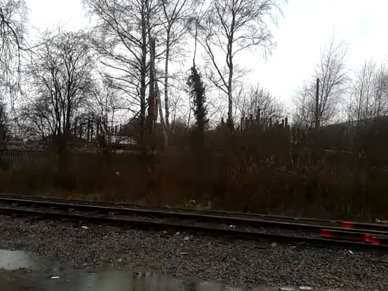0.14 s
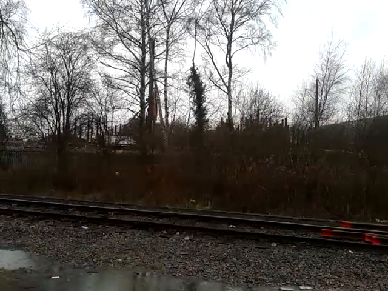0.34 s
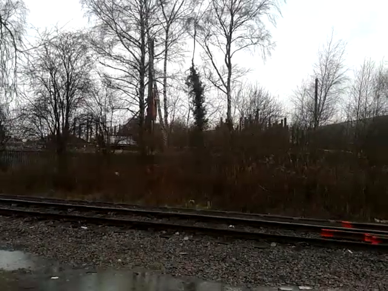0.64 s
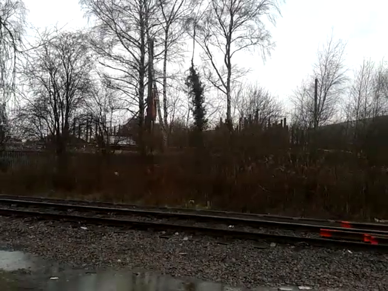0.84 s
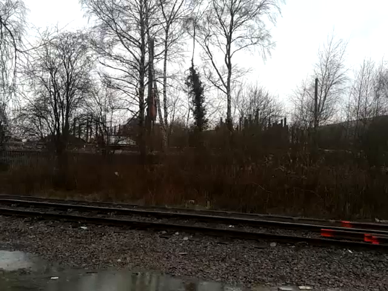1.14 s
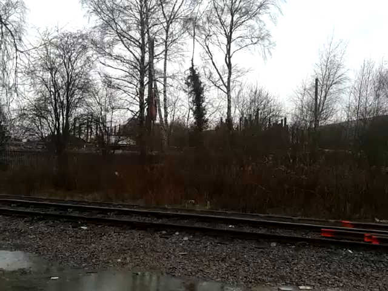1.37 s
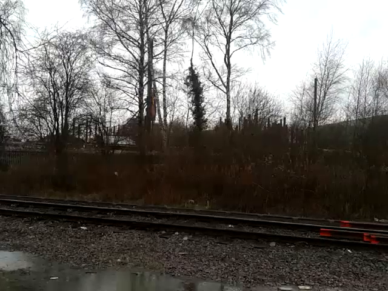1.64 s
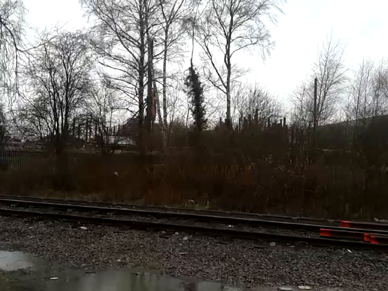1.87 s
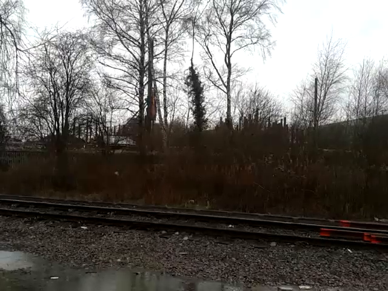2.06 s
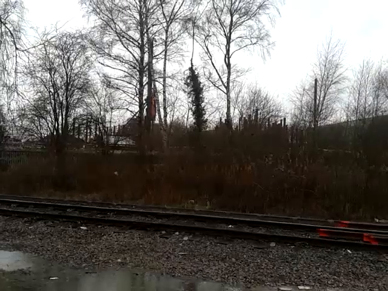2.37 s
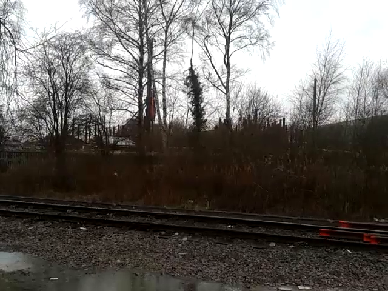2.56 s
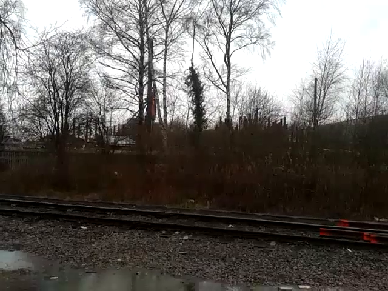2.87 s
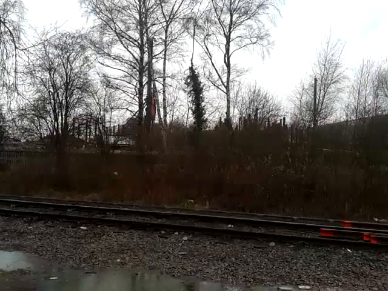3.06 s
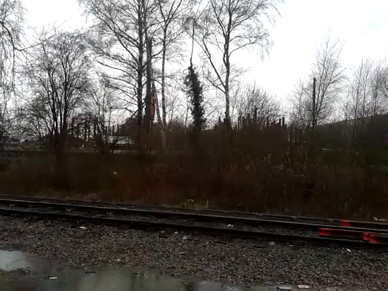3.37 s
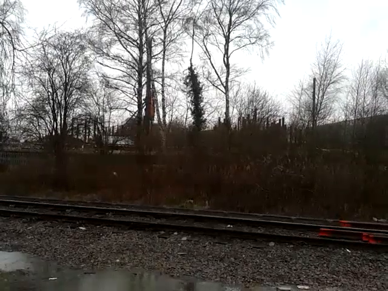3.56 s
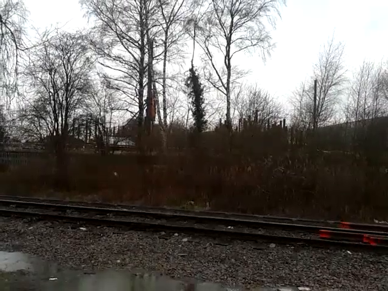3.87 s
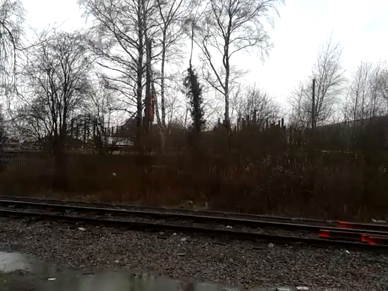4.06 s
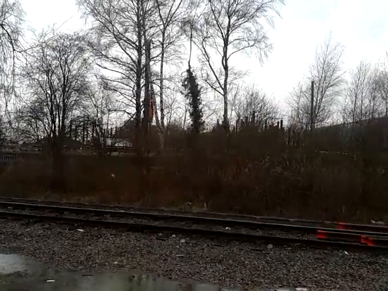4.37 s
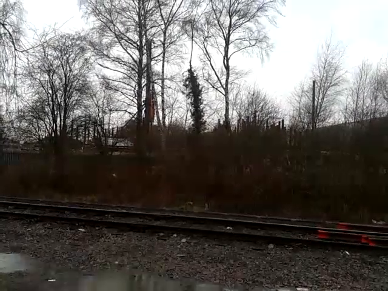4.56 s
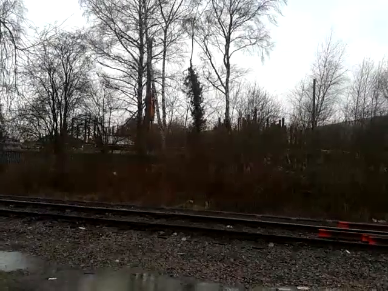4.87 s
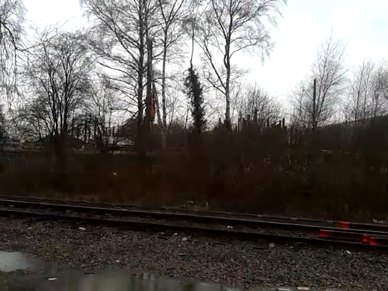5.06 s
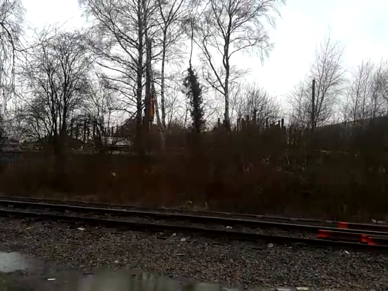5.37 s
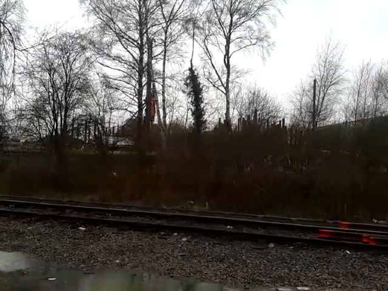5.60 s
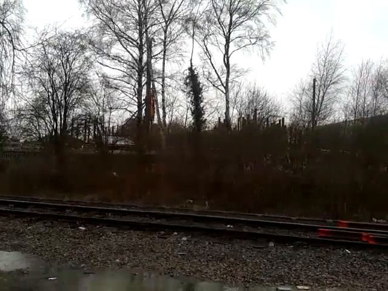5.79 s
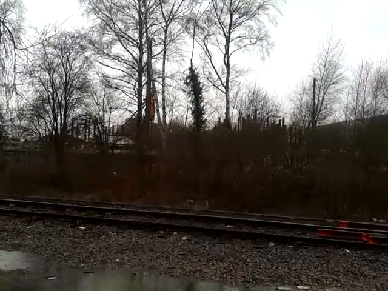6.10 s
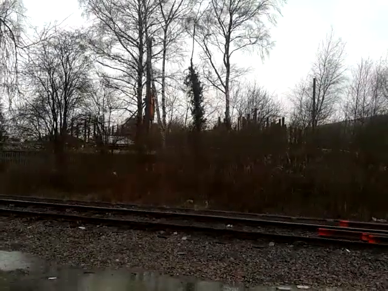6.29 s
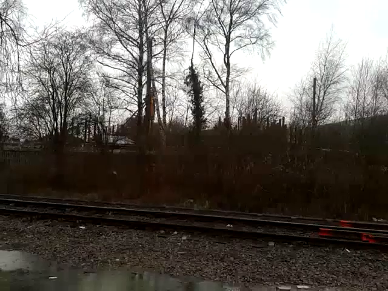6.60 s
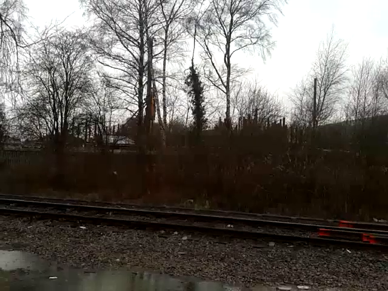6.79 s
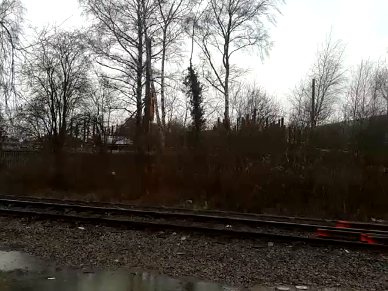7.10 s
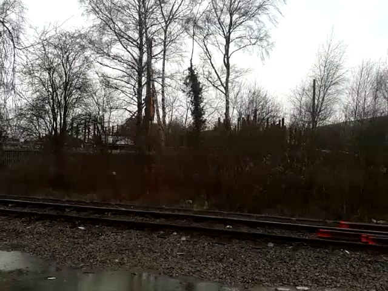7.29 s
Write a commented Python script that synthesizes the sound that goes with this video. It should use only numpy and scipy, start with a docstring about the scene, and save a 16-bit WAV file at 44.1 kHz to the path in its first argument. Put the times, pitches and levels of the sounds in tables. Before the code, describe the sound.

Evenly spaced metallic bangs from a far-off pile driver, with ringing steel, scattered echoes, small clinks between blows and a low engine drone.

```python
"""A distant piling hammer strikes a steel pile about once a second, heard across waste ground and trees.
Each blow begins as a thud, a crack and ringing steel, decaying modes under a noise burst; filtered echoes
from ground and walls follow, then a long scattered tail of noise, while the mast rings on.
Some blows are followed by pings of loose steel, and the ram clinks as it lifts before the next. Throughout,
the engine hums as a surging and sagging sine, over shaped noise of far machines, wind thumps and a few ticks."""
import sys
import numpy as np
from scipy import signal
from scipy.fft import rfft, irfft
from scipy.io import wavfile
from scipy.ndimage import uniform_filter1d

SR = 44100
rng = np.random.default_rng(int(sys.argv[2]) if len(sys.argv) > 2 else 0)


def dump_mix(stems):
    """Bounce the given channels to the path in sys.argv[1] as a 16-bit WAV at rate SR."""
    frames = np.atleast_2d(stems).T  # one column per channel
    limited = np.clip(frames, -1, 1)  # hard clip at full scale
    pcm = np.round(limited * 32767).astype(np.int16)
    wavfile.write(sys.argv[1], SR, pcm)


N = 328104  # samples in the scene

# Background of far machines and wind. Each row: frequency in Hz, relative spectral level in dB.
YARD_SPECTRUM = [(15, -27), (25, -88), (124, -0.5), (286, -6.5), (357, -3), (957, -8), (1220, -2.5),
                 (1420, -5), (2630, -12), (3280, -10), (4090, -16.5), (5920, -14), (9000, -44),
                 (11700, -54), (19800, -120)]
YARD_DB, HISS_DB = -45, -57  # rms of the background and of the microphone's hiss, before filtering

# The governor hunts in a repeating swing. Each row: time into the swing in seconds, firing rate in Hz.
ENGINE_SWING = [(0, 121), (.23, 130), (.6, 123), (.9, 117.8), (1.4, 121.2)]
SWING_S, SWING_START_S = 1.775, .15  # period and offset of the swing, seconds
ENGINE_DB = -58.5  # rms of the firing tone

# Puffs of wind on the microphone. Each row: start in seconds, level in dB, frequency in Hz.
WIND_THUMPS = [(1.659, -42, 88.8), (2.52, -36, 32.4)]

# Small dry ticks near the microphone. Each row: start in seconds, level in dB, centre in Hz, width in Hz.
DRY_TICKS = [(4.9285, -29, 4200, 3960), (5.0980, -32, 8450, 4000), (6.5700, -23.5, 10500, 5000)]
TICK_S = .0006  # time constant of a tick's decay, seconds

# Loose steel after some blows. Each row: start in seconds, level in dB, nominal frequency in Hz.
STEEL_PINGS = [(0.7897, -9.5, 5490), (4.3934, -11, 5400), (4.4942, -11, 5480), (4.5353, -15, 5600),
               (4.5803, -11, 5480), (5.3903, -17, 5470), (5.9783, -36, 7260)]

# Clinks of the lifting ram. Each row: time in seconds, level in dB.
RAM_CLINKS = [(0.5594, -36), (1.4321, -43), (2.372, -43), (3.2645, -37.5), (4.1794, -44), (5.0704, -41),
              (5.9614, -40.5), (6.8638, -40.5)]
# A light touch before each clink and a bounce after. Each row: lag in seconds, relative level in dB.
CLINK_CHATTER = [(-.018, -4), (0, 3), (.017, -6)]
# Modes of the clink. Each row: frequency in Hz, relative level in dB, t60 in seconds.
CLINK_MODES = [(3250, 5.5, 0.034), (3290, 2, 0.04), (3520, -11, 0.034), (3550, 4, 0.058)]

# Modes of the ram. Each row: frequency in Hz, relative level in dB, t60 in seconds.
RAM_MODES = [(3350, -9, 0.13), (3694, -9, 0.3), (3970, 2, 0.051), (4180, -8, 0.026), (4570, -17.5, 0.19),
             (4770, -29, 0.03), (5050, -14, 0.12), (5640, -9.5, 0.082), (6020, -16, 0.14),
             (6540, -20, 0.14), (7100, -16.5, 0.13)]
# Modes of the pile and its cap. Each row: frequency in Hz, relative level in dB, t60 in seconds.
PILE_MODES = [(499, -2, 0.069), (812, -19.5, 0.075), (899, -10.5, 0.066), (1176, -14, 0.11),
              (1644, -10, 0.13), (2090, -5, 0.098)]
# Modes of the mast. Each row: frequency in Hz, relative level in dB, t60 in seconds.
MAST_MODES = [(537.5, -13, 2.5), (541, -23, 1.8), (536, -7, .33), (1517, -11.5, .6), (1523, -26, 3.0),
              (1546, -17, .4), (2875, -21, .9), (2870, -33, 3.0), (3690, -19, 1.1)]
LOW_RING_HZ = 1000  # mast modes below this are set blow by blow

# Spectrum of the crack. Each row: frequency in Hz, relative spectral level in dB.
CRACK_SPECTRUM = [(60, -34), (150, 3), (300, 14), (600, -4.5), (1100, 3.5), (1800, -5), (2500, 0),
                  (3800, 9.5), (5000, 1.5), (6400, 4.5), (7500, -9), (9500, -19), (12000, -39),
                  (16000, -70)]
STEEL_LAG_S = 0.001003  # the crack and the ring trail the thud by this, seconds
SPAN = 2 ** 14  # samples that one arrival lasts

# Reflections from ground and walls. Each row: delay in seconds, then bass, middle and treble gain in dB.
REFLECTIONS = [(.011, -4, 2.5, 0), (.030, -4.5, 12, -8), (0.0374, -23, 6.5, -6.5), (.048, -11, 5.5, -10),
               (.072, -9.5, -2, -8), (.129, -20, 4.5, -8.5), (.18, -31, -3, -15.5),
               (.219, -21.5, -1, -15.5), (.268, -23, -12, -19), (.391, -19.5, -11.5, -16),
               (.418, -16.5, -9.5, -24)]
# Frequencies in Hz at which the bass, middle and treble gains apply.
REFLECTION_HZ = (267, 770, 3900)
NEAR_S = .1  # echoes later than this, in seconds, count as far

# Scattering by trees and far buildings. Each row: frequency in Hz, relative level in dB, early t60 in seconds.
SCATTER_BANDS = [(60, -72, 0.33), (132, -20, 0.92), (250, 3, 1), (497, 9.5, 0.9), (860, 1.5, 0.99),
                 (2140, 0.5, 1.0), (3480, 0.5, 1), (5800, -3, 0.89), (7400, -15.5, 0.89), (9300, -39, 0.31),
                 (13000, -59, .5)]

# The blows, the first just before the start. Each row: start in seconds, strength in dB, then the gains in dB
# of the mast's low ring, of the ram's ring and of the far echoes.
HAMMER_BLOWS = [(-.194, -15, -9.5, 6.5, 2.5), (0.7073, -14.5, 1.5, 3.5, 2.5), (1.6076, -14, -6, -1.5, 1.5),
                (2.51, -15, 0, -4, -0.5), (3.4118, -15, -0.5, 4.5, 0.5), (4.3126, -13.5, -1.5, -1, 2.2),
                (5.2119, -15, -2.5, 0.5, -0.5), (6.1124, -14.5, -4, 0.5, 4), (7.0109, -14, -7.5, 5.5, -0.5)]
USUAL_DB, DULLING = -15, 1  # each dB above the usual strength takes this many dB off the treble

EDGE_HZ = 15400  # upper band limit of the recorder


def gain_of(db):
    """Amplitude is ten to the power of a twentieth of the level in decibels."""
    return 10 ** (np.asarray(db) / 20)


def evened(x):
    """Division by the root mean square normalises a signal to rms 1."""
    return x / np.sqrt(np.mean(x ** 2) + 1e-20)


def read(hz_points, values, hz):
    """Interpolation along a logarithmic frequency axis joins the points by straight lines."""
    return np.interp(np.log(hz + 1), np.log(np.asarray(hz_points) + 1), values)


def smoothed(x, size, axis=-1, second_size=None, second_axis=-1):
    """Two running means in turn leave only the slow drift of a noise, here at rms 1."""
    once = uniform_filter1d(x, size=size, axis=axis)
    return evened(uniform_filter1d(once, size=second_size, axis=second_axis))


def add(mix, s, sound):
    """Superposition: sounds sum sample by sample from time s, which may lie before the start."""
    at = round(s * SR)
    part = mix[max(at, 0):][:len(sound) + min(at, 0)]
    part += sound[max(-at, 0):][:len(part)]


def ring(modes, size, rise, spread_db):
    """Modal decay: struck steel sums dying sines, of random phase and of level varying at each call."""
    t = np.arange(size) / SR
    sound = np.zeros(size)
    for hz, db, t60 in modes:
        level_luck, phase_luck = rng.standard_normal(2)
        decay = gain_of(db + spread_db * level_luck - 60 * t / t60)
        sound += decay * np.sin(2 * np.pi * hz * t + np.pi * phase_luck)
    return sound * (1 - np.exp(-t / rise))


def yard():
    """Incoherent addition: far machines and wind merge into shaped noise with drifting patches."""
    frames, hz = N // 256 + 5, np.fft.rfftfreq(1024, 1 / SR)
    real, imaginary, patches = rng.standard_normal((frames, 513, 3)).T
    patches = smoothed(patches, 12, axis=0, second_size=14, second_axis=1)
    level_db = read(*np.transpose(YARD_SPECTRUM), hz)[:, None] + 1.6 * patches
    spectrum = (real + 1j * imaginary) * gain_of(level_db)
    noise = signal.istft(spectrum, nperseg=1024, noverlap=768)[1][:N]
    return gain_of(YARD_DB) * evened(noise)


def engine():
    """Frequency modulation: the hunting firing rate, summed to phase, drives a tone and its half order."""
    swing_s = np.arange(N) / SR - SWING_START_S
    firing_hz = np.interp(swing_s, *np.transpose(ENGINE_SWING), period=SWING_S)
    firings = np.cumsum(firing_hz) / SR
    tone = np.sin(2 * np.pi * firings)
    half_order = gain_of(-15) * np.sin(np.pi * firings)
    return np.sqrt(2) * gain_of(ENGINE_DB) * (tone + half_order)


def wind():
    """Pressure pulses: each puff on the microphone is a low sine that swells and dies quickly."""
    out, t = np.zeros(N), np.arange(8000) / SR
    swell = (t / 0.013) * np.exp(1 - t / 0.012)
    for s, db, hz in WIND_THUMPS:
        add(out, s, gain_of(db) * np.sin(2 * np.pi * hz * t) * swell)
    return out


def ticks():
    """Impulsive noise: a band of high noise under a steep exponential decay makes a dry snap."""
    out, t, hz = np.zeros(N), np.arange(1024) / SR, np.fft.rfftfreq(1024, 1 / SR)
    for s, db, centre_hz, width_hz in DRY_TICKS:
        band = np.exp(-((hz - centre_hz) / width_hz) ** 2)
        snap = evened(irfft(rfft(rng.standard_normal(1024)) * band))
        add(out, s, gain_of(db) * snap * np.exp(-t / TICK_S))
    return out


def pings():
    """Beating of neighbouring modes: a close pair makes loose steel clink, not whistle."""
    out = np.zeros(N)
    for s, db, hz in STEEL_PINGS:
        pair = [(hz + 60, -4, .03), (hz - 120, -7, .025)]  # Hz, dB, t60 in seconds
        add(out, s, gain_of(db) * ring(pair, size=4000, rise=0.002, spread_db=2.5))
    return out


def clinks():
    """Repeated impact: the lifting ram touches, strikes and bounces, exciting its modes each time."""
    out = np.zeros(N)
    for s, db in RAM_CLINKS:
        for lag, touch_db in CLINK_CHATTER:
            touch = ring(CLINK_MODES, size=6000, rise=0.004, spread_db=3.0)
            add(out, s + lag, gain_of(db + touch_db) * touch)
    return out


def scattered():
    """Diffuse decay: countless weak reflections merge into noise, each band dying at its own speed."""
    hz, t, spectrum = signal.stft(rng.standard_normal(2 * SR), SR, nperseg=256)
    band_hz, level_db, t60 = np.transpose(SCATTER_BANDS)
    fall_db = 60 * t / read(band_hz, t60, hz)[:, None]
    decay = np.hypot(gain_of(-fall_db), gain_of(-10.5 - 0.43 * fall_db))  # far reflections die more slowly
    # random patches make the tail's level uneven over time and frequency
    patches = smoothed(rng.standard_normal(spectrum.shape), 8, axis=0, second_size=5, second_axis=1)
    spectrum = spectrum * gain_of(read(band_hz, level_db, hz))[:, None] * decay * gain_of(1.42 * patches)
    tail = signal.istft(spectrum, SR, nperseg=256)[1][:2 * SR]
    return tail * (1 - np.exp(-np.arange(2 * SR) / SR / 0.048))


def mast(low_ring_db):
    """Lightly damped resonance: the mast's modes ring on, and each wavers on its way."""
    out = np.zeros(2 * SR)
    for mode_hz, db, t60 in MAST_MODES:
        sway = smoothed(rng.standard_normal(2 * SR), 2000, second_size=500)
        level_db = low_ring_db * (mode_hz < LOW_RING_HZ) + 2.9 * sway
        out += gain_of(level_db) * ring([(mode_hz, db, t60)], size=2 * SR, rise=0.0067, spread_db=1.5)
    return out


def arrival(ram_db, pile_db, rise):
    """Propagation: spectrum of thud, crack and ring along one path, stirring air roughening crack and ring."""
    t, hz = np.arange(SPAN) / SR, np.fft.rfftfreq(SPAN, 1 / SR)
    push = (t / 0.0021) * np.exp(1 - t / 0.0018)
    thud = gain_of(-3.5) * np.sin(2 * np.pi * 255 * t) * push  # the pile's push
    burst = rng.standard_normal(SPAN) * gain_of(-60 * t / 0.15) * (1 - np.exp(-t / rise))
    crack = rfft(burst) * gain_of(read(*np.transpose(CRACK_SPECTRUM), hz))
    ram_ring = gain_of(ram_db) * ring(RAM_MODES, size=SPAN, rise=rise, spread_db=3.0)
    pile_ring = gain_of(pile_db) * ring(PILE_MODES, size=SPAN, rise=rise, spread_db=3.5)
    delay = np.exp(-2j * np.pi * hz * STEEL_LAG_S)
    return rfft(thud) + (rfft(ram_ring + pile_ring) + crack) * delay


def blow(db, mast_db, ram_db, far_db):
    """Superposition of paths: direct sound, echoes, scattered tail and the ringing mast."""
    out, hz = scattered(), np.fft.rfftfreq(SPAN, 1 / SR)
    add(out, 0, irfft(arrival(ram_db, pile_db=-0.1, rise=0.0021)))
    for s, *colour_db in REFLECTIONS:
        carried = gain_of(read(REFLECTION_HZ, colour_db, hz) + far_db * (s > NEAR_S))
        # rough walls blunt the attack and blur the ring
        add(out, s, irfft(arrival(ram_db - 10.0, pile_db=-5.5, rise=0.0028) * carried))
    add(out, .04, mast(mast_db))  # the shock reaches the mast late
    hz = np.fft.rfftfreq(2 * SR, 1 / SR)
    treble = np.clip(np.log2(hz / 1000 + 1e-9), 0, 1)  # none below 1 kHz, full above 2 kHz
    treble_db = -DULLING * (db - USUAL_DB) * treble
    return irfft(rfft(out) * gain_of(db + treble_db))


def hammer():
    """Periodic impact: the ram falls on the pile about once a second, each blow computed anew."""
    out = np.zeros(N)
    for s, *row in HAMMER_BLOWS:
        add(out, s, blow(*row))
    return out


def scene():
    """Superposition at the microphone: the pressures of all the sources add."""
    return (yard() + engine() + wind() + ticks() + pings() + clinks() + hammer())[None]


def record(dry):
    """Linear filtering: the microphone cuts the bass and adds hiss, the recorder limits the band."""
    thin = signal.sosfilt(signal.butter(2, 55, "high", fs=SR, output="sos"), dry)
    hissing = thin + gain_of(HISS_DB) * rng.standard_normal(N)
    band_limit = signal.firwin(511, EDGE_HZ, window=("kaiser", 9), fs=SR)
    return signal.oaconvolve(hissing, band_limit[None], "same")


dry = scene()
out = record(dry)
dump_mix(out)
```